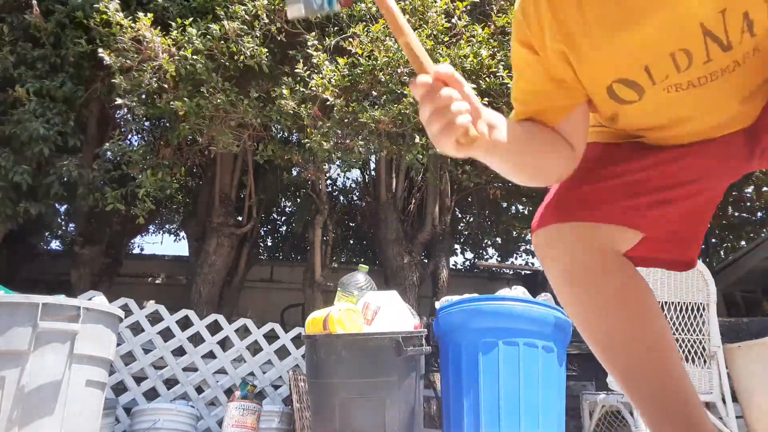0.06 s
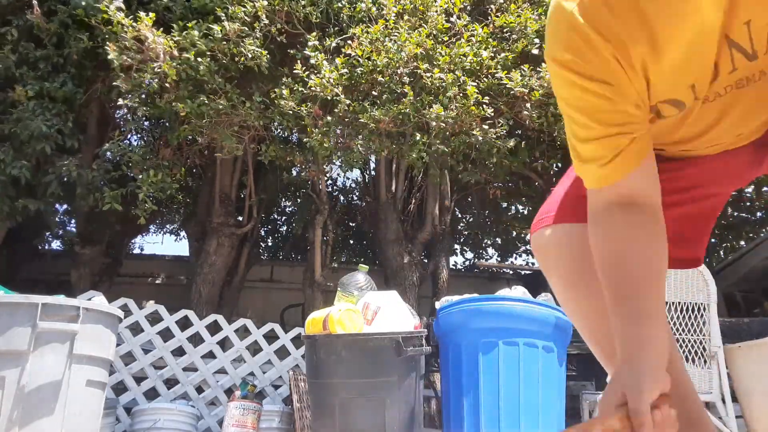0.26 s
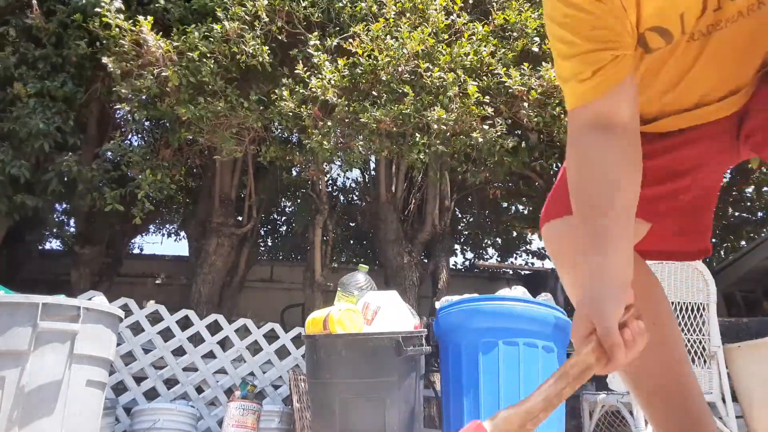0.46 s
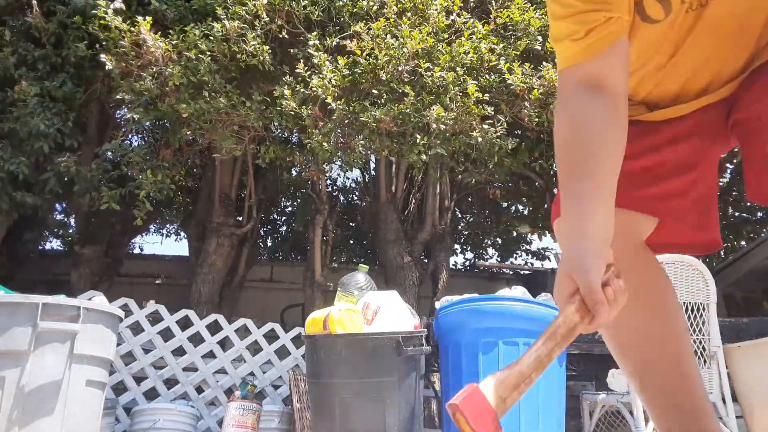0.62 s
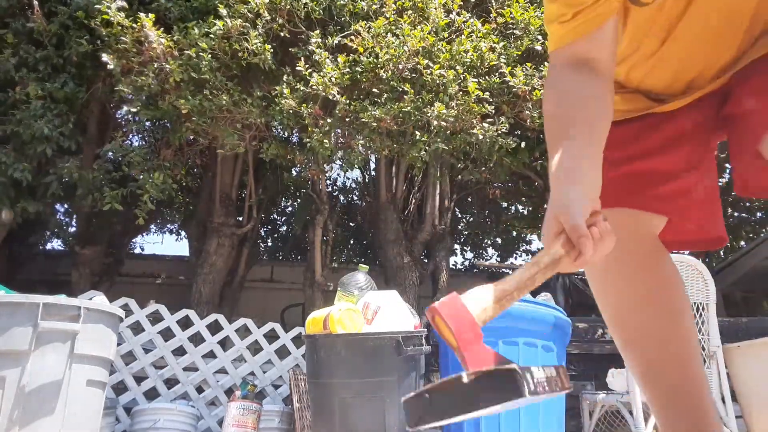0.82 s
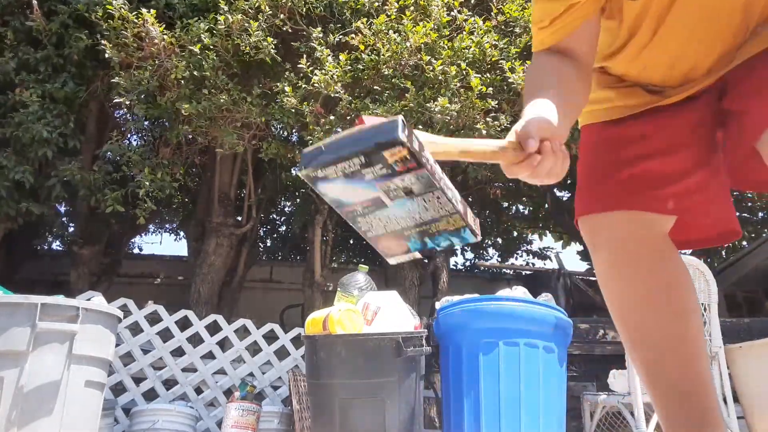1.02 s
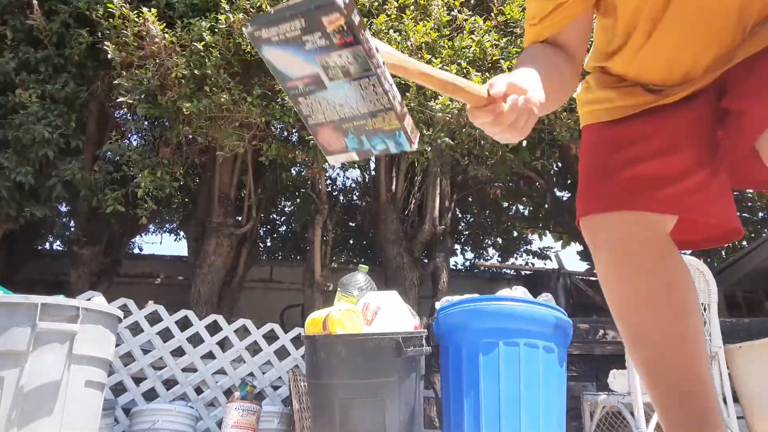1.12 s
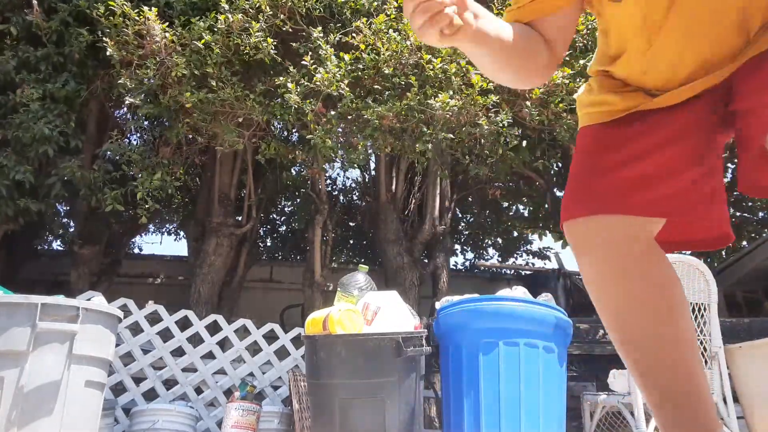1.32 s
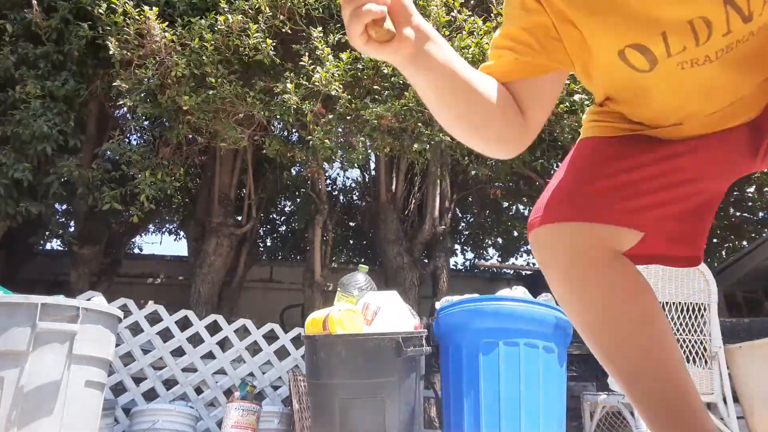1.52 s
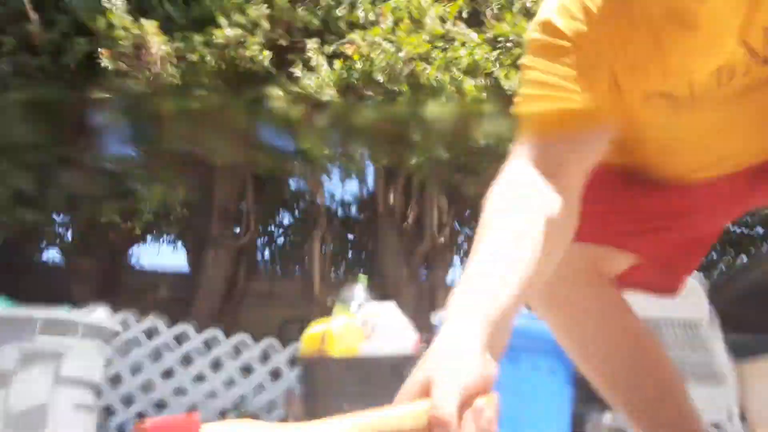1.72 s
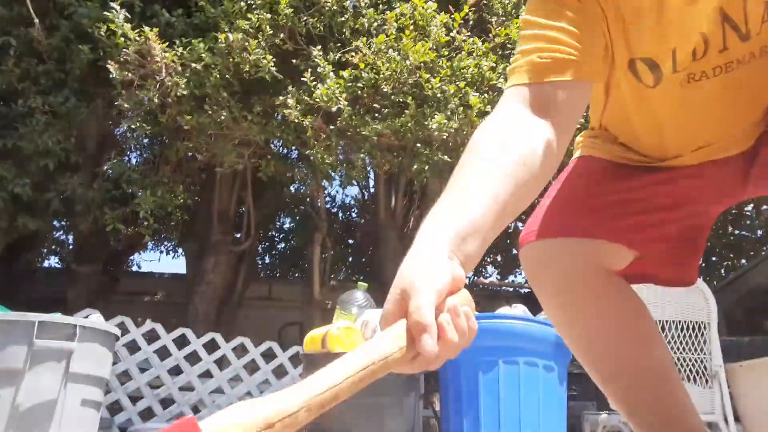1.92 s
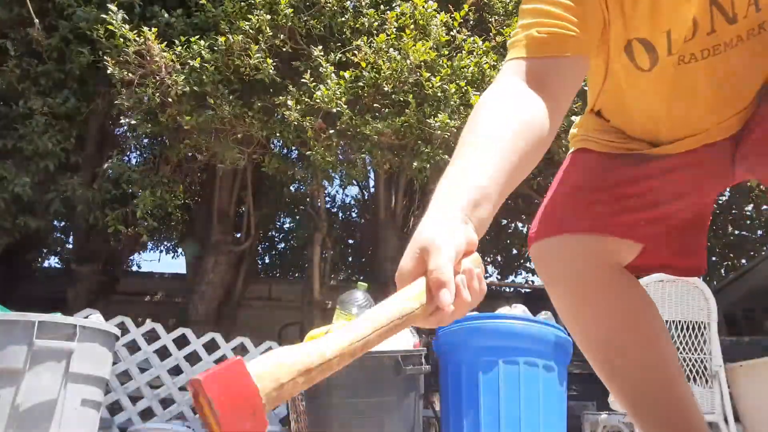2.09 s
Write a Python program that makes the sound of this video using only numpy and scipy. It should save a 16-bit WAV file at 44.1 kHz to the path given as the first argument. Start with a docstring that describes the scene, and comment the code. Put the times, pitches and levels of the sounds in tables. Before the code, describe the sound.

Two sharp hatchet blows splinter a hollow plastic shell on the ground, close up in a yard

```python
"""Hatchet chops into a plastic cassette

Two blows split a hard shell in a back yard, close by: shaped noise bursts crack and land, sines ring and thud.
Decaying noise echoes them off the fences; tiny pitched snaps, ticking shards and grit follow each blow.
Noise knocks and ringing steel modes tell of the blade lifted with the case stuck on it.
Cloth rustles as fitful noise before each blow, puffs of air buffet the left microphone, and a far town rumbles.
"""
import sys
import numpy as np
from scipy import signal
from scipy.fft import rfft, irfft
from scipy.io import wavfile
from scipy.ndimage import uniform_filter1d

SR = 44100
rng = np.random.default_rng(int(sys.argv[2]) if len(sys.argv) > 2 else 0)


def master(y):
    """Save y as 16-bit WAV."""
    cut = np.clip(np.atleast_2d(y).T, -1, 1)
    pcm = np.round(cut * 32767)  # scale
    wavfile.write(sys.argv[1], SR, pcm.astype(np.int16))


N = 94815  # length [samples]
TREBLE_HZ = 4650  # where treble shelves and the echo's treble begin
CHOP_PAN_DB = 2.5  # left minus right, for chops, handling and cloth


def amp(db):
    """Decibels to gain."""
    return 10 ** (np.asarray(db) / 20)


def unit(x):
    """Scale to an rms of one."""
    return x / np.sqrt(np.mean(x ** 2))


def pan(db):
    """Left and right gains for a left-minus-right difference in dB."""
    return amp(np.array([[db], [-db]]) / 2)


def since(start):
    """Seconds since a moment, zero before it."""
    return np.maximum(np.arange(N) / SR - start, 0)


def fall(start, t60):
    """Sudden onset, then exponential decay by 60 dB in t60 seconds."""
    t = since(start)
    return (t > 0) * np.exp(-np.minimum(np.log(1000) * t / t60, 60))


def colour(x, points):
    """Minimum-phase filter through (Hz, dB) points that keeps the power of white noise."""
    size = 2 ** 17
    hz, db = np.array(points, float).T
    bins_hz = np.arange(size // 2 + 1) * SR / size
    gain = unit(amp(np.interp(np.log(bins_hz + 1), np.log(hz), db)))
    # Folding the cepstrum onto positive time makes the filter causal
    cepstrum = irfft(np.log(gain))
    cepstrum[1:size // 2] *= 2
    cepstrum[size // 2 + 1:] = 0
    response = np.exp(rfft(cepstrum))
    return irfft(rfft(x, size) * response, size)[..., :N]


def shelf(x, db):
    """Raise or lower the treble."""
    treble = signal.lfilter(*signal.butter(1, TREBLE_HZ, "high", fs=SR), x)
    return x + (amp(db) - 1) * treble


GRAIN_SHARED = 0.12  # share of the noise power common to both microphones


def grains(spread):
    """Stereo noise whose size jumps every 16 samples, rougher as the spread grows."""
    z = rng.standard_normal((4, N))
    noise = np.sqrt(GRAIN_SHARED) * z[2] + np.sqrt(1 - GRAIN_SHARED) * z[:2]
    grain_size = np.exp(spread * np.repeat(z[3], 16)[:N])
    return unit(noise * grain_size)


def burst(start, t60):
    """A quickly dying run of splintery grains with unit energy in each channel."""
    x = grains(spread=0.51) * fall(start, t60)
    return x / np.sqrt(np.sum(x ** 2, axis=1, keepdims=True))


def ring(start, hz, t60):
    """One decaying mode, reaching each microphone in its own phase."""
    phase = rng.uniform(0, np.pi, (2, 1))
    return fall(start, t60) * np.sin(2 * np.pi * hz * since(start) + phase)


def wander(size):
    """Smooth random drift with a spread of one."""
    once = uniform_filter1d(rng.standard_normal(N), size)
    return unit(uniform_filter1d(once, size))


YARD_DELAY_S, YARD_T60_S, YARD_TREBLE_T60_S = 0.0039, 0.3, 0.29
YARD_KNOCK_DB = -5  # echo level for landings, snaps and knocks


def yard(x, db):
    """Add scattered echoes of ground and fences as decaying noise; the treble dies sooner."""
    z = grains(spread=0.37)
    low = signal.lfilter(*signal.butter(1, TREBLE_HZ, fs=SR), z)
    echo = low * fall(YARD_DELAY_S, YARD_T60_S) + (z - low) * fall(YARD_DELAY_S, YARD_TREBLE_T60_S)
    echo = echo / np.sqrt(np.sum(echo ** 2) / 2)
    return x + amp(db) * signal.fftconvolve(x, echo, axes=1)[:, :N]


# The two blows; treble also sets how much grit follows:
# (time [s], crack level before CRACK_DB [dB], treble [dB], thud level [dB], splinter t60 [s], crackle t60 [s])
BLOWS = [(0.2061, -1.5, -4.5, -17, 0.021, .26), (1.7048, -4, 1, -22.5, 0.039, .42)]
# Further fractures as the blade sinks in: (time [s], level before CRACK_DB [dB])
FRACTURES = [(0.2095, -7), (0.2266, -7.5), (1.7104, -7.5), (1.7442, -14.5)]
# Colour of cracking plastic: (frequency [Hz], relative level [dB])
CRACK_COLOUR = [(40, -4), (140, -6.5), (330, -2), (800, 2), (1400, -1.5), (2700, -2), (4400, -4),
                (5800, -10.5), (7800, -12), (10000, -4.5), (15500, -6)]
CRACK_DB, FRACTURE_T60_S = 16.5, 0.013


def crack():
    """The shell splinters in a noise burst at each blow, with shorter bursts as it gives further."""
    later = sum(amp(CRACK_DB + db) * burst(s, FRACTURE_T60_S) for s, db in FRACTURES)
    first = sum(amp(CRACK_DB + db) * shelf(burst(s, t60), treble) for s, db, treble, _, t60, _ in BLOWS)
    return colour(later + first, CRACK_COLOUR)


# Landings of the case, and a late soft knock: (time [s], level [dB])
LANDINGS = [(0.235, 1.5), (0.294, -9), (0.321, -3.5), (0.329, -4.5), (1.7254, 3), (1.7439, 3), (1.806, -27),
            (1.984, -7)]
# Colour of the landings and the soft knock: (frequency [Hz], relative level [dB])
LANDING_COLOUR = [(60, -35), (280, -14.5), (520, 8.5), (1000, 5), (1800, -4), (4300, -5), (6500, -12.5),
                  (15000, -18)]


def landings():
    """Landings of the case, and a late soft knock, as short, mid-heavy noise bursts."""
    contact = sum(amp(db) * burst(s, t60=0.039) for s, db in LANDINGS)
    return colour(contact, LANDING_COLOUR)


# Modes of the shell: (frequency [Hz], t60 [s], level at first blow [dB], level at second blow [dB])
SHELL_MODES = [(534.4, 0.33, -28, -26.5), (697, 0.095, -36, -17.5), (877, 0.16, -21.5, -36),
               (1557, 0.14, -19.5, -39), (2320, 0.1, -18.5, -30), (2864, 0.2, -25, -25.5),
               (3404, 0.13, -27.5, -26)]


def shell_ring():
    """Each blow sets the shell's modes ringing in a balance of its own."""
    return sum(amp(levels[blow]) * ring(row[0], hz, t60)
               for blow, row in enumerate(BLOWS) for hz, t60, *levels in SHELL_MODES)


def thud():
    """The ground answers each blow with a short low sine."""
    return sum(amp(db) * fall(s, t60=0.04) * np.sin(2 * np.pi * 146 * since(s))
               for s, _, _, db, *_ in BLOWS)


def chops():
    """The blade splinters the shell, which rings, thuds and lands; cracks, landings and soft knock echo."""
    cracking, landing, ringing = crack(), landings(), shell_ring()
    echoing = yard(cracking, db=0) + yard(landing, YARD_KNOCK_DB)
    return pan(CHOP_PAN_DB) * (echoing + ringing + thud())


SNAP_COUNT, SNAP_T60_S, SNAP_DB = 200, 0.006, -14  # count is per blow
SNAP_LOW_HZ, SNAP_HIGH_HZ = 800, 5500


def crackle():
    """Broken pieces snap and jostle after each chop, each with a brief ring at its own pitch."""
    out = np.zeros((2, 2 * N))
    t = np.arange(int(SNAP_T60_S * SR)) / SR
    for start, *_, t60 in BLOWS:
        # "when" is a fraction of the crackle's t60, so later snaps are weaker
        for when, pitch, size, *phases in rng.random((SNAP_COUNT, 5)):
            hz = SNAP_LOW_HZ * (SNAP_HIGH_HZ / SNAP_LOW_HZ) ** pitch
            decay = np.exp(-np.log(1000) * (when + t / SNAP_T60_S))
            phase = np.pi * np.array(phases)[:, None]
            at = int((start + when * t60) * SR)
            out[:, at:at + len(t)] += size * decay * np.sin(2 * np.pi * hz * t + phase)
    return yard(amp(SNAP_DB) * pan(CHOP_PAN_DB) * out[:, :N], YARD_KNOCK_DB)


# Shards landing by the microphones: (time [s], level [dB], left minus right [dB], treble [dB])
SHARDS = [(0.3514, 5, 6.5, -24), (0.3592, 5.5, -6, -20), (0.3854, -7.5, 21, -26), (0.419, -9.5, -6, -25),
          (0.691, -32.5, -11, 6.5), (0.87, -23, -4, 5), (1.8622, -5.5, -2, 3), (1.869, -4, 13, 1.5),
          (1.872, -8, 9, 2.5), (1.897, -11.5, 12, -3), (1.9388, -7.5, 5, 2), (2.0101, -12, 4, 4)]
# Colour of shards and grit: (frequency [Hz], relative level [dB])
SHARD_COLOUR = [(200, -29), (2000, -5.5), (4000, -1.5), (6500, -6), (9500, 3), (15500, 3)]
GRIT_DB, GRIT_T60_S = -38, 0.88


def shards():
    """Splinters tick down near the microphones and fine grit settles, more of it after a brighter blow."""
    ticks = sum(amp(db) * pan(side) * shelf(burst(s, t60=0.011), treble) for s, db, side, treble in SHARDS)
    settling = sum(amp(treble) * fall(s, GRIT_T60_S) for s, _, treble, *_ in BLOWS)
    grit = amp(GRIT_DB) * grains(spread=1) * settling
    return yard(colour(ticks + grit, SHARD_COLOUR), db=-11.5)


# Dull knocks of handle and case: (time [s], level [dB], treble [dB])
KNOCKS = [(0.108, -8.5, 9), (0.142, -18, -6), (0.174, -15, 14.5), (0.433, -12.5, -13), (0.521, -12, 8.5),
          (0.535, -13, 6.5), (0.948, -10.5, -18), (0.966, -16.5, -22), (1.243, -15, -13),
          (1.589, -11.5, -2), (1.609, -5.5, -13), (1.634, -5, 9.5), (1.67, -11.5, 15.5)]
# Colour of the knocks: (frequency [Hz], relative level [dB])
KNOCK_COLOUR = [(60, -22), (200, -2), (550, 4.5), (840, 14), (1450, -4.5), (3000, -13.5), (6500, -37),
                (12000, -24.5)]


def knocks():
    """Handle and case knock in dull noise bursts."""
    contact = sum(amp(db) * shelf(burst(s, t60=0.047), treble) for s, db, treble in KNOCKS)
    return colour(contact, KNOCK_COLOUR)


def hollow_case():
    """The case answers each knock with one hollow mode, 24 dB below the knock's listed level."""
    return sum(amp(db - 24) * ring(s, hz=834, t60=0.089) for s, db, _ in KNOCKS)


# Clinks of the steel head: (time [s], level relative to the modes [dB], tilt [dB per octave])
CLINKS = [(0.521, 0, 0), (0.864, -17, 3), (1.245, -7, -7), (1.443, -14, 0)]
# Modes of the steel head: (frequency [Hz], t60 [s], level before the clink's level and tilt [dB])
STEEL_MODES = [(2060, .13, -40), (2200, .09, -39), (1400, .04, -41), (3275, .14, -47), (4560, .12, -57),
               (9180, .09, -53), (10690, .1, -55)]


def clinks():
    """The steel head rings in its modes; tilt leans their balance about the first one listed."""
    pivot_hz = STEEL_MODES[0][0]
    out = 0
    for start, db, tilt in CLINKS:
        for hz, t60, mode_db in STEEL_MODES:
            level_db = db + mode_db + tilt * np.log2(hz / pivot_hz)
            out = out + amp(level_db) * ring(start, hz, t60)
    return out


def handling():
    """Knocks echo in the yard; the hollow case and the clinking steel ring without echo."""
    knocking, hollow, clinking = knocks(), hollow_case(), clinks()
    return pan(CHOP_PAN_DB) * (yard(knocking, YARD_KNOCK_DB) + hollow + clinking)


# Clothes rustle through each downswing; a negative rise fades:
# (start [s], end [s], relative level at the end [dB], rise from start to end [dB])
SWINGS = [(0.0, 0.17, -57.5, -12), (1.481, 1.707, -36.5, 13.5)]
# Colour of the cloth: (frequency [Hz], relative level [dB])
CLOTH_COLOUR = [(60, 6), (500, 2.5), (900, 8), (1600, -8), (4000, -7.5), (6500, -17), (11000, -14.5),
                (15500, -23)]
RUSTLE_DB, RUSTLE_FADE_S = 3.5, 0.028  # spread of the fits, fade-in


def swings():
    """Cloth rubs as grainy noise in fits, fading through the first swing and swelling through the second."""
    t = since(0)
    swell = 0
    for start, end, db, rise in SWINGS:
        gate = np.minimum(since(start) / RUSTLE_FADE_S, 1) * (t < end)
        swell = swell + gate * amp(db + rise * (t - end) / (end - start))
    fits = amp(RUSTLE_DB * wander(size=400))
    return pan(CHOP_PAN_DB) * colour(swell * fits * grains(spread=0.37), CLOTH_COLOUR)


# Air pushed over the left microphone: (time [s], length [s], level [dB])
PUFFS = [(0.359, 0.17, -25.5), (1.693, 0.037, -20), (1.747, 0.049, -9), (1.803, 0.065, -14),
         (1.864, 0.064, -17.5)]
# Colour of the air: (frequency [Hz], relative level [dB])
PUFF_COLOUR = [(20, -29), (55, 0.5), (130, -2), (320, -10), (500, -19), (1300, -70.5)]
PUFF_RISE_S, PUFF_RIGHT_DB = 0.01, -24.5  # right channel relative to left


def puffs():
    """Eddies in the pushed air rumble as levelled low noise, almost all on the left microphone."""
    flow = sum(amp(db) * np.minimum(since(s) / PUFF_RISE_S, 1) * np.clip(1 - since(s) / length, 0, 1)
               for s, length, db in PUFFS)
    eddies = colour(rng.standard_normal((2, N)), PUFF_COLOUR)
    eddies = eddies / np.sqrt(uniform_filter1d(eddies ** 2, size=1800, axis=1))
    return flow * eddies * amp([[0], [PUFF_RIGHT_DB]])


# Colour of the distant town: (frequency [Hz], relative level per Hz [dB])
TOWN_COLOUR = [(25, -37), (61, -2.5), (104, -2), (274, -6.5), (389, -10), (660, -6.5), (2420, -26),
               (6550, -41), (12200, -39), (15500, -43.5)]
TOWN_DB, TOWN_PAN_DB = -43.5, 3
TOWN_LAG_S, TOWN_SHARED_HZ = 0.00028, 1640  # right channel's lag; sharing fades above this frequency


def town():
    """Distant rumble from the left; its treble is unrelated between the microphones."""
    z = rng.standard_normal((3, N))
    hz = np.arange(N // 2 + 1) * SR / N
    share = .85 / (1 + (hz / TOWN_SHARED_HZ) ** 4)
    far = rfft(z[2]) * np.exp(-2j * np.pi * hz * np.array([[0], [TOWN_LAG_S]]))
    air = irfft(np.sqrt(share) * far + np.sqrt(1 - share) * rfft(z[:2]), N)
    return amp(TOWN_DB) * pan(TOWN_PAN_DB) * colour(air, TOWN_COLOUR)


def scene():
    """Everything heard in the yard."""
    return chops() + crackle() + shards() + handling() + swings() + puffs() + town()


GAIN_KNEE_DB, GAIN_SLOPE, GAIN_RELEASE_DB_PER_S = -6.5, 0.087, 14  # slope: dB of cut per dB over the knee


def gain_control(x):
    """Loud sounds turn the gain down a little; it creeps back afterwards."""
    power = np.abs(uniform_filter1d(np.mean(x ** 2, axis=0), size=200))
    loud_db = 10 * np.log10(power + 1e-12)
    # A running peak that sinks at the release rate
    recovery = GAIN_RELEASE_DB_PER_S * since(0)
    held_db = np.maximum.accumulate(loud_db + recovery) - recovery
    return x * amp(-GAIN_SLOPE * np.maximum(held_db - GAIN_KNEE_DB, 0))


LOW_CUT_HZ, TOP_HZ, DRIVE = 38, 15900, 0.17


def record(dry):
    """Thin the deep bass, ride the gain, round the loudest peaks and cut the top."""
    thinned = signal.sosfilt(signal.butter(3, LOW_CUT_HZ, "high", fs=SR, output="sos"), dry)
    rounded = np.tanh(DRIVE * gain_control(thinned)) / DRIVE
    return signal.sosfilt(signal.ellip(10, .2, 70, TOP_HZ, fs=SR, output="sos"), rounded)


dry = scene()
out = record(dry)
master(out)
```